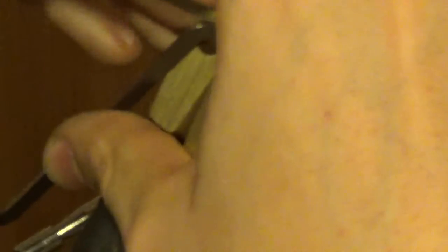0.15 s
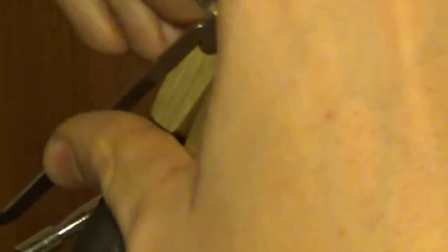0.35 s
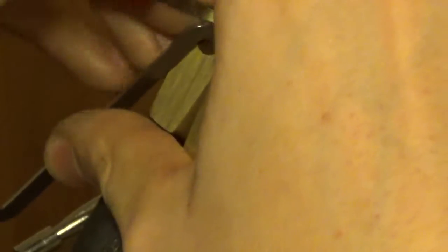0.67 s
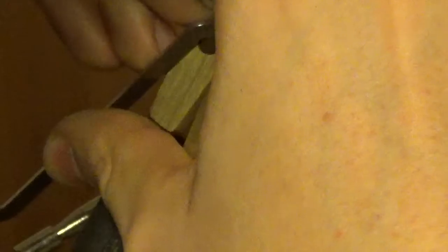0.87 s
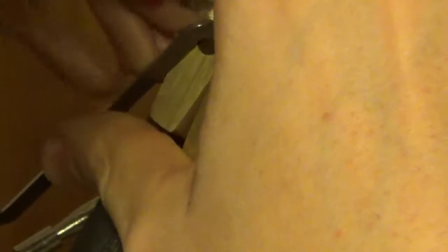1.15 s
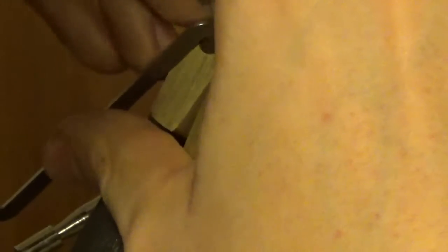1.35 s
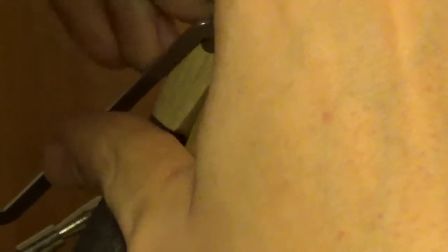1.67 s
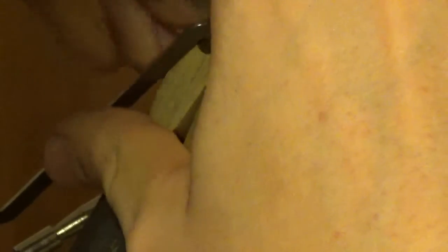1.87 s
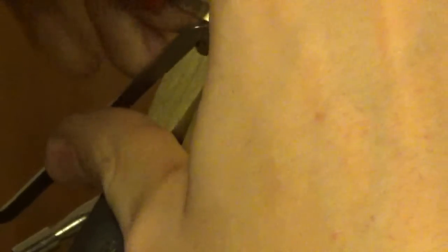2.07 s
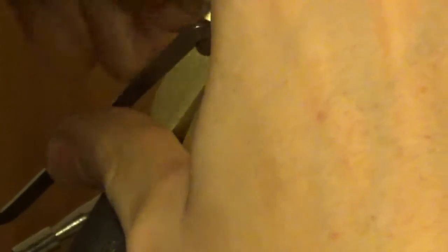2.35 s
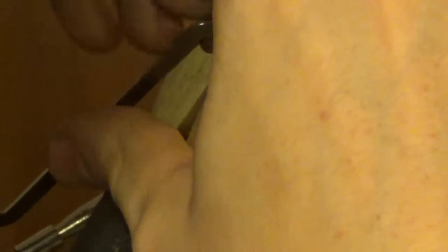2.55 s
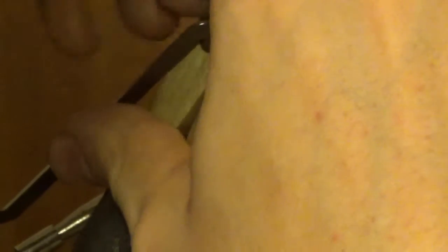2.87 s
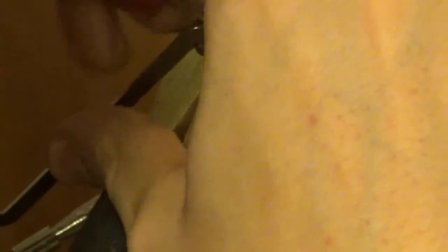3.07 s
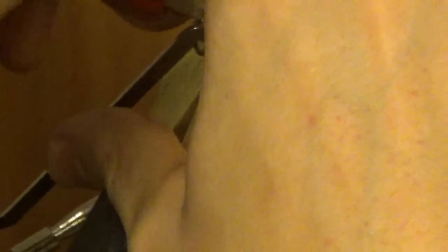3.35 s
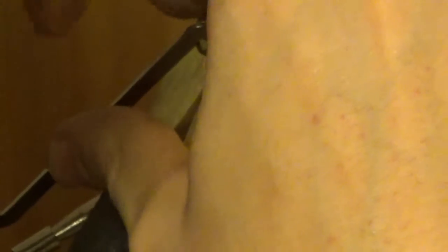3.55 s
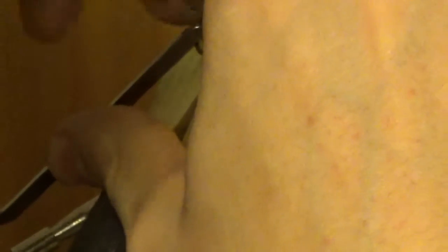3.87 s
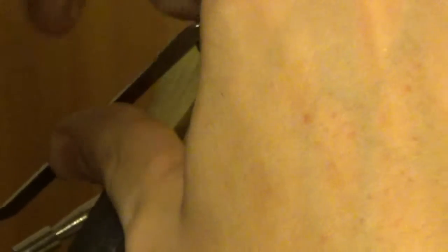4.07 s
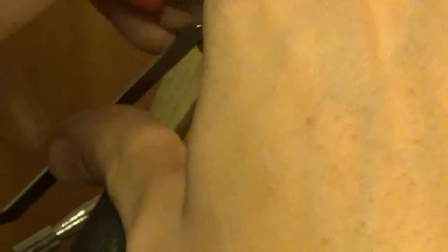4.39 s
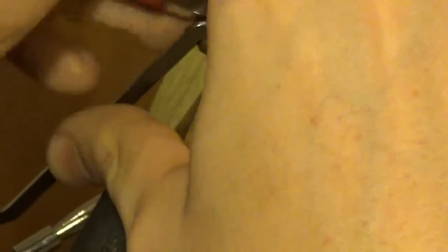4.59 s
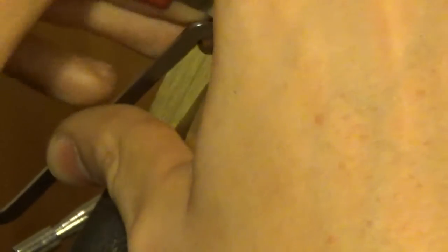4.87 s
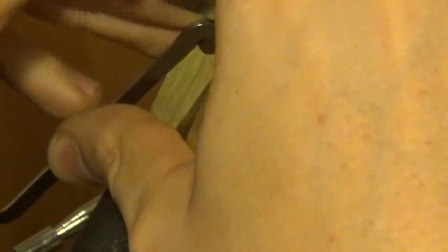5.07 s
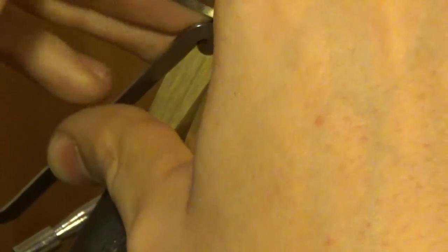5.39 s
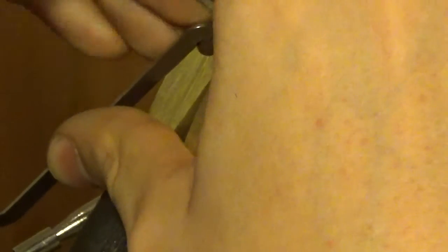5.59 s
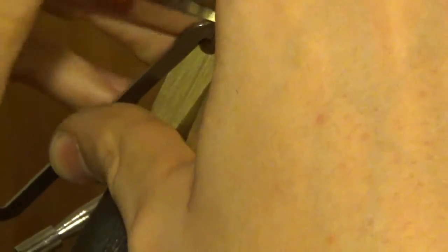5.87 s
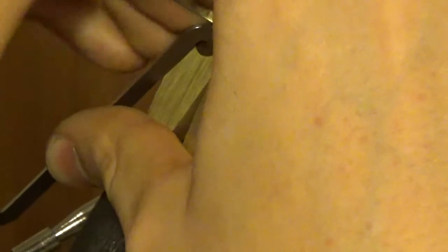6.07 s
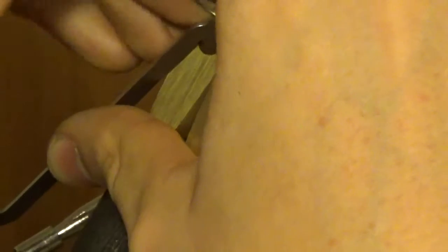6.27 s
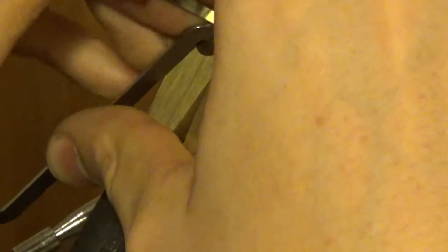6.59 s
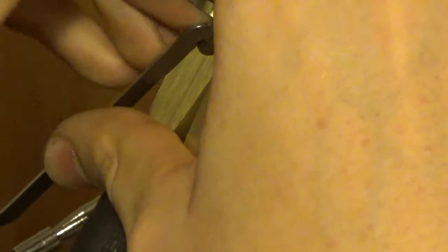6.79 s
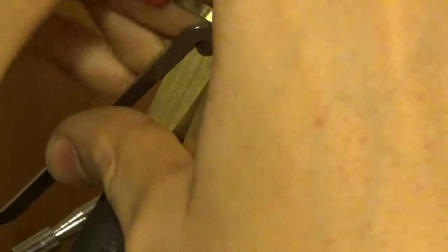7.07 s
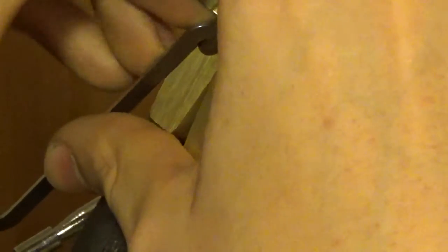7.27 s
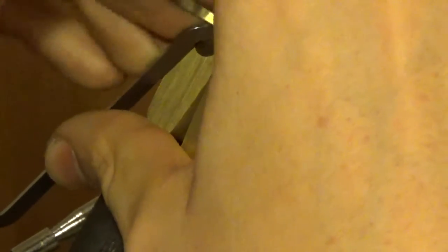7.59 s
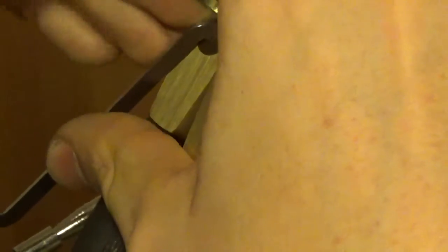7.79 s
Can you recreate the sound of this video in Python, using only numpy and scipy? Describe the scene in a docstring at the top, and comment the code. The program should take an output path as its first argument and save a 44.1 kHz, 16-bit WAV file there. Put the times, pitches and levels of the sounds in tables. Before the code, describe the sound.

Close, bright metallic snaps and tiny scrapes of a lock being picked, hands bumping and rubbing it softly over low hiss.

```python
"""A steel pick clicks in a brass padlock, close by in a small quiet room: noise bursts excite the metal's modes.
Between clicks it scratches along the keyway (random ticks in the same modes) and briefly squeaks (short chirps).
The hands rub and bump the lock: stick-slip pulses and judders ring in its low resonances as thuds and scuffs.
A short diffuse echo follows; coloured noise hisses, a faint whistle flickers and a low sine gives mains hum."""
import sys
import numpy as np
from scipy import signal
from scipy.fft import rfft, irfft
from scipy.io import wavfile

SR = 44100
rng = np.random.default_rng(int(sys.argv[2]) if len(sys.argv) > 2 else 0)


def file_out(sig):
    """Save sig as 16-bit WAV at sys.argv[1]."""
    # one column per channel
    cols = np.atleast_2d(sig).T
    # limit, then scale
    lim = np.clip(cols, -1, 1)
    pcm = np.round(lim * 32767).astype(np.int16)
    wavfile.write(sys.argv[1], SR, pcm)


N = 350154

# strokes of the hand that works the pick, four or five a second; levels are relative:
# start_s (moment of greatest strength), length_s, level_db, scuff_against_thud_db
STROKES = [(0.232, 0.03, -53.5, -19.5), (0.288, 0.015, -47, -13), (0.556, 0.022, -54, 1.5),
           (0.816, 0.018, -49, -4.5), (1.118, 0.024, -45, -8), (1.284, 0.042, -43, -7.5),
           (1.486, 0.026, -50.5, -8.5), (1.647, 0.038, -45.5, -11), (1.866, 0.017, -59, 0),
           (1.978, 0.07, -47, -4.5), (2.147, 0.018, -46, -9), (2.297, 0.053, -41, -5.5),
           (2.456, 0.037, -49.5, -5), (2.605, 0.023, -35, -7.5), (2.754, 0.054, -49, -6),
           (2.896, 0.034, -35, -7), (3.072, 0.063, -49.5, -5), (3.209, 0.036, -37.5, -10.5),
           (3.375, 0.03, -50, 2), (3.521, 0.043, -40.5, -6.5), (3.83, 0.094, -45, -6),
           (4.004, 0.023, -45.5, -9), (4.151, 0.044, -43, -3.5), (4.349, 0.042, -49.5, -11),
           (4.84, 0.019, -44, -17), (5.306, 0.027, -53.5, -7.5), (5.545, 0.025, -50.5, -4.5),
           (6.153, 0.042, -55, -18), (6.428, 0.029, -52, -9), (6.649, 0.028, -50, -21),
           (6.749, 0.019, -40, -19), (7.002, 0.042, -52, -9), (7.153, 0.034, -47.5, -11),
           (7.463, 0.051, -58.5, -4.5), (7.685, 0.036, -47.5, -9.5), (7.883, 0.039, -62, -3)]
# low hollow resonances of the lock under the hands: frequency_hz, width_hz, level_db
THUD_MODES = [(84.5, 55, -14), (139.8, 15.5, -8), (222, 21, 3.5), (351, 31.2, 2.5), (381.4, 82.5, -6)]
# higher resonances that a scuff brings out: frequency_hz, width_hz, level_db
SCUFF_MODES = [(520, 107, 3.5), (781.5, 75, 3.5), (997, 114, 0), (1500, 1660, -8.5)]
# ringing modes of pick, pins and lock, with relative levels: frequency_hz, width_hz, level_db
METAL_MODES = [(1500, 830, -5.5), (2560, 1900, -10.5), (3350, 2300, -2.5), (5180, 27, -13),
               (5080, 2400, -11.5), (6120, 570, -13.5), (7170, 3200, -13), (8130, 1400, -7),
               (9450, 710, -7.5), (11200, 11, -59), (10190, 620, -3.5), (10490, 440, -5.5)]
# centres of the three registers of a click, in the order ping, snap, clack: frequency_hz
REGISTER_HZ = [10000, 6000, 2600]
# pick and pins snapping, with relative levels: start_s, level_db, snap_against_ping_db
CLICKS = [(0.4454, -24.5, -20), (0.7881, -34.5, -20), (0.8149, -39, -10.5), (1.0899, -28.5, -24),
          (1.149, -16, -29), (1.2411, -10, -12.5), (1.2784, -24, -10.5), (1.399, -22.5, -24.5),
          (1.6394, -25, -16.5), (1.6546, -31, -6), (1.77, -44, -2.5), (1.9204, -36, -16), (1.942, -28, -24),
          (1.9856, -30, -18), (2.2668, -13, -20.5), (2.2706, -11.5, -25.5), (2.3566, -25.5, -35),
          (2.4009, -33, -11), (2.5413, -6.5, -26), (2.5944, -7.5, -17), (2.76, -28.5, -18),
          (2.858, -10, -25.5), (2.8817, -20.5, -13), (2.9897, -21, -17.5), (3.0862, -30.5, -20),
          (3.1522, -28, -25), (3.1827, -9, -33), (3.2003, -9.5, -30), (3.2787, -27.5, -17.5),
          (3.462, -9.5, -32), (3.5142, -4, -24.5), (3.691, -34.5, -12.5), (3.8115, -30, -17),
          (3.8396, -37, -8), (3.9287, -18, -21.5), (3.9855, -31, -14), (4.1187, -33.5, -13),
          (4.1556, -35, -14), (4.802, -28, -8), (4.8303, -22.5, -14), (4.877, -35, -23), (4.974, -24, -15),
          (5.2889, -32.5, -23), (5.3023, -28, -26), (5.481, -44, -4.5), (5.5175, -7.5, -32.5),
          (5.5445, -23, -9.5), (5.7929, -33, -15.5), (5.9212, -31.5, -22), (6.2552, -24, -21.5),
          (6.3937, -28.5, -28), (6.4228, -35, -21), (6.7313, -17, -12), (6.9318, -30.5, -17.5),
          (7.1427, -36, -39), (7.215, -17, -22.5), (7.2372, -33, -16), (7.392, -32.5, -24),
          (7.4816, -35, -19), (7.7023, -35.5, -11.5)]
# echo of the room: frequency_hz, t60_s, level_against_direct_db, left_right_likeness (0 to 1)
ROOM = [(303.4, 0.064, -10, 0.81), (1170, 0.089, -1, 0.06), (4910, 0.14, -2, 0.43),
        (10540, 0.16, -11, 0.73)]


def from_db(db):
    """Decibels express amplitude ratios: 20 dB is a factor of ten."""
    return 10 ** (np.asarray(db) / 20)


def rms_one(x):
    """Normalization to unit mean power."""
    return x / np.sqrt(np.mean(x ** 2) + 1e-20)


def unit_energy(x):
    """Normalization of each row to unit energy."""
    return x / np.sqrt(np.sum(x ** 2, axis=-1, keepdims=True) + 1e-20)


def at_hz(points, hz):
    """Interpolation on a log-frequency axis, for every column after the frequency."""
    known_hz, *columns = np.transpose(points)
    return [np.interp(np.log(hz + 1), np.log(known_hz), column) for column in columns]


def resonate(x, hz, width_hz):
    """A damped mode as a two-pole resonator: bandwidth sets the decay; peak gain is about 1."""
    radius = np.exp(-np.pi * width_hz / SR)
    zeros = np.array([1, 0, -1]) * (1 - radius * radius) / 2
    poles = [1, -2 * radius * np.cos(2 * np.pi * hz / SR), radius * radius]
    return signal.lfilter(zeros, poles, x + 1e-18)


def body(force, modes):
    """Modal superposition: parallel resonances of alternating sign share one force."""
    total = 0
    for k, (hz, width_hz, db) in enumerate(modes):
        total = total + (-1) ** k * from_db(db) * resonate(force, hz, width_hz)
    return total


def place(times, sounds):
    """Linear superposition: each short sound is added at its time in seconds."""
    out = np.zeros(N + SR)
    for s, sound in zip(times, sounds):
        start = max(round(s * SR), 0)
        out[start:start + len(sound)] += sound
    return out[:N]


def diffuse_noise(size):
    """Partial coherence: spectra of left and right noise share a part that depends on frequency."""
    alike = np.clip(at_hz(ROOM, np.fft.rfftfreq(size, 1 / SR))[-1], 0, 1)
    mid, side = rfft(rng.standard_normal((2, size)))
    return np.sqrt((1 + alike) / 2) * mid + np.sqrt((1 - alike) / 2) * side * [[1], [-1]]


def background(hiss_db=-60.5, whistle_hz=2750, whistle_db=-76, hum_hz=50.9, hum_db=-69.5):
    """Stationary noise and a sine: steady hiss, a narrow-band flickering whistle and mains hum; rms levels."""
    # spectrum of the room's hiss, relative levels: frequency_hz, density_db_per_hz
    hiss_spectrum = [(22, -39), (50, -12), (100, -10), (145, -3.5), (500, -12.5), (1200, -16.5),
                     (2200, -18), (4000, -22.5), (11000, -26.5)]
    colour_db, = at_hz(hiss_spectrum, np.fft.rfftfreq(N, 1 / SR))
    hiss = rms_one(irfft(diffuse_noise(N) * from_db(colour_db), N))

    flicker = resonate(rng.standard_normal(N), 12.5, 11.7) ** 2
    narrow_noise = resonate(resonate(rng.standard_normal(N), whistle_hz, 460), whistle_hz, 460)
    whistle = rms_one(flicker * narrow_noise)

    hum = rms_one(np.sin(2 * np.pi * hum_hz * np.arange(N) / SR))
    return from_db(hiss_db) * hiss + from_db(whistle_db) * whistle + from_db(hum_db) * hum


def swell(s, length_s, db, rise=0.99, fall=1):
    """Exponential growth and decay of power in one movement; rise and fall are in stroke lengths."""
    t = np.arange(0, N, 32) / SR - s  # every 32nd sample is enough for a slow envelope
    return from_db(db) ** 2 * np.exp(-2 * abs(t / length_s / np.where(t < 0, rise, fall)))


def movements(rows):
    """Incoherent addition: powers of the movements sum, and the root is the gain over time."""
    gain = np.sqrt(sum(swell(*row) for row in rows))
    return np.interp(np.linspace(0, 1, N), np.linspace(0, 1, len(gain)), gain)


def jerks(per_s):
    """Stick-slip friction: pushes at random moments, of like size and either sign."""
    happens = rng.random(N) < per_s / SR
    return happens * rng.choice([-1, 1], N) * rng.uniform(0.29, 1, N)


def driven(force, gain, modes):
    """Forced vibration: a force of changing strength rings in the modes; its level follows the gain."""
    return body(force * gain, modes) / np.std(body(force, modes))


def rubbing(thuds_per_s=700, scuffs_per_s=220, thud_db=1.5, scuff_db=0.0,
            grit_db=-18, grit_hz=2200, grit_width_hz=2500):
    """Stick-slip of skin on the lock: many small jerks excite thud, scuff and a little grit."""
    push = movements([(s, length_s, db) for s, length_s, db, bright_db in STROKES])
    slide = movements([(s, length_s, db + bright_db) for s, length_s, db, bright_db in STROKES])
    slips = jerks(scuffs_per_s)
    thud = from_db(thud_db) * driven(jerks(thuds_per_s), push, THUD_MODES)
    scuff = from_db(scuff_db) * driven(slips, slide, SCUFF_MODES)
    grit = from_db(grit_db) * push * rms_one(resonate(slips, grit_hz, grit_width_hz))
    return thud + scuff + grit


def scratches(per_s=450, spread_db=5, tilt_db=6.0):
    """Random impulses excite modes: burrs tick in the metal, tilted in dB per octave; rms 1."""
    happens = rng.random(N) < per_s / SR
    ticks = happens * from_db(spread_db * np.minimum(rng.exponential(1, N), 3))
    total = 0
    for hz, width_hz, db in METAL_MODES:
        level_db = db + tilt_db * np.log2(hz / REGISTER_HZ[1])
        total = total + from_db(level_db) * resonate(ticks * rng.standard_normal(N), hz, width_hz)
    return rms_one(total)


def scraping(full_scale_db=-31.5, follows=0.52):
    """Friction noise grows with sliding: the pick drags along the keyway during every stroke."""
    # follows: share of the scuff's level swing, in dB, that the scratching takes up
    drag = movements([(s, length_s, full_scale_db + follows * (db + bright_db))
                      for s, length_s, db, bright_db in STROKES])
    return drag * scratches()


def brushed_pins(count=2, tick_db=-46, spread_db=2.5, tick_snap_db=-13.5, scatter=1.0):
    """Random impacts: each stroke brushes pins at scattered moments; rows like those of the clicks."""
    s, length_s, _, _ = np.repeat(STROKES, count, axis=0).T
    when, strength, colour = rng.standard_normal((len(s), 3)).T
    start_s = s + scatter * length_s * when  # scatter is in stroke lengths
    return np.transpose([start_s, tick_db + spread_db * strength, tick_snap_db + spread_db * colour])


def clicks(slip_s=0.00083, chatter_s=0.0012, rattle_s=0.014, rattle_db=-21, looseness=0.17,
           scatter_db=2.5, travel_s=0.0012, hit_db=12.5):
    """Impact excitation of modes: the pick slips, the pin hits home, chatters and rattles briefly."""
    s, db, dull_db = np.vstack([CLICKS, brushed_pins()]).T
    # every click shares its strength between the registers in the same way
    ping_db, snap_db, clack_db = db - 12.5, db + dull_db + 0.5, db + dull_db - 7.5

    lead_s = .004  # time kept ahead of the hit for the slip
    t = np.arange(SR // 8) / SR - lead_s
    # a pure ping is dry, a deep clack shakes more parts loose
    loose_db = rattle_db + looseness * (clack_db - ping_db)
    rattle = from_db(loose_db)[:, None] * np.exp(-abs(t) / rattle_s)
    slip = np.exp(-abs(t) / slip_s)
    force = np.where(t < 0, slip, np.exp(-abs(t) / chatter_s) + rattle)
    hit = from_db(hit_db) * signal.unit_impulse(len(t), round(lead_s * SR))
    chatter = force * rng.standard_normal(force.shape) + hit

    registers = sorted(zip(REGISTER_HZ, *np.transpose([ping_db, snap_db, clack_db])))
    out = 0
    for hz, width_hz, mode_db in METAL_MODES:
        level_db = np.array(at_hz(registers, hz)) + mode_db + scatter_db * rng.standard_normal(len(s))
        out = out + from_db(level_db)[:, None] * unit_energy(resonate(chatter, hz, width_hz))
    return place(s + travel_s - lead_s, out * np.sqrt(lead_s * SR))


def knocks(contact_s=0.005, edge_db=0.0, edge_hz=1750, edge_width_hz=1900):
    """A decaying contact force excites modes: the lock shifts in the grip and knocks the wrench."""
    # knocks, with the peak level of each before the echo: start_s, peak_db
    knock_events = [(0.28, -41), (1.617, -44.5), (1.677, -37), (2.049, -49), (2.316, -36), (2.909, -27),
                    (3.229, -32), (3.374, -44), (3.549, -34.5), (4.176, -39), (6.61, -44.5), (6.733, -34),
                    (7.02, -47), (7.66, -38)]
    s, db = np.transpose(knock_events)
    t = np.arange(SR // 12) / SR
    judder = np.exp(-t / contact_s) * rng.standard_normal((len(s), len(t)))
    edge = unit_energy(resonate(judder, edge_hz, edge_width_hz))
    sound = unit_energy(body(judder, SCUFF_MODES)) + from_db(edge_db) * edge
    return place(s, from_db(db)[:, None] * sound / abs(sound).max(axis=1, keepdims=True))


def squeaks(length_s=0.0012, width_hz=150):
    """Frictional singing: for a few milliseconds steel on brass gives a tone with a random glide."""
    # squeaks, timed at their middle: start_s, pitch_hz, peak_db
    squeak_events = [(.445, 2750, -38), (.449, 5200, -39.5), (1.564, 2560, -43.5), (3.345, 2800, -44),
                     (3.376, 2430, -38.5), (4.803, 2400, -35)]
    t = np.arange(SR // 25) / SR
    middle_s = t.mean()
    offset = (t - middle_s) / length_s
    chirps = []
    for s, hz, db in squeak_events:
        pitch_hz = hz + width_hz * rng.standard_normal() * offset
        tone = np.sin(2 * np.pi * np.cumsum(pitch_hz) / SR)
        chirps.append(from_db(db) * np.exp(-offset ** 2) * tone)
    return place(np.array(squeak_events)[:, 0] - middle_s, chirps)


def recoil(level_db=-11.5):
    """Impulse response: every listed click jolts the whole lock, which thuds in the hand."""
    s, db, dull_db = np.transpose(CLICKS)
    thud = body(signal.unit_impulse(SR // 4), THUD_MODES)
    return place(s, from_db(db + dull_db + level_db)[:, None] * thud / abs(thud).max())


def room(x, build_s=0.0005):
    """Diffuse reverberation: convolution with noise whose bands build up fast and decay by their own t60."""
    size = SR // 2
    t, hz = np.arange(size) / SR, np.fft.rfftfreq(size, 1 / SR)
    noise, echo = diffuse_noise(size), 0
    edges_hz = np.geomspace(60, 13000, 15)
    for low, high in zip(edges_hz, edges_hz[1:]):
        t60_s, wet_db, _ = at_hz(ROOM, np.sqrt(low * high))
        fade = unit_energy(from_db(-60 * t / t60_s) * (1 - np.exp(-t / build_s)))
        band = irfft(noise * ((hz >= low) & (hz < high)), size)
        echo = echo + from_db(wet_db) * fade * band
    return signal.fftconvolve(x[None], echo, axes=1)[:, :N]


def scene(click_db=-2.0, left_db=-0.34):
    """Superposition of direct sound, echo and background; a level difference sets the lock almost ahead."""
    pick = from_db(click_db) * clicks() + scraping() + squeaks()
    lock = pick + recoil() + knocks() + rubbing()
    return (lock + room(lock)) * from_db([[left_db], [-left_db]]) + background()


def record(dry, ceiling=0.21, cutoff_hz=11230):
    """Saturation and low-pass filtering: sharp peaks are rounded, then the top is cut steeply."""
    size = SR // 200 * 2 + 1
    low_pass = signal.firwin(size, cutoff_hz, window="blackman", fs=SR)
    rounded = ceiling * np.tanh(dry / ceiling)
    return signal.fftconvolve(rounded, low_pass[None], "same", axes=1)


dry = scene()
out = record(dry)
file_out(out)
```